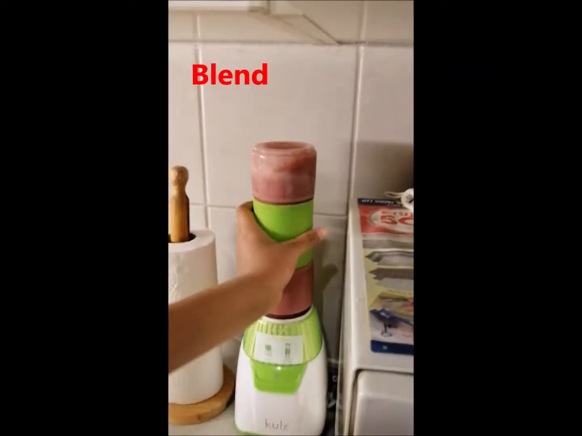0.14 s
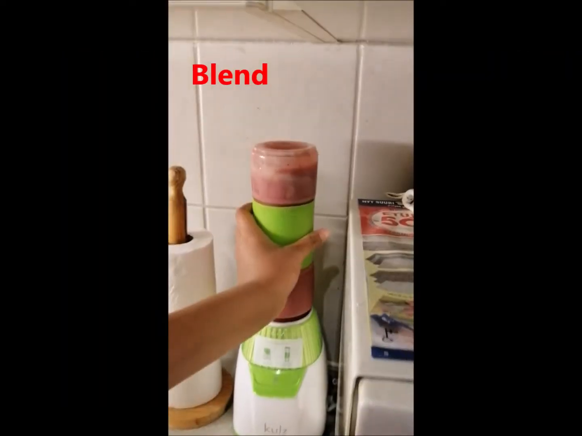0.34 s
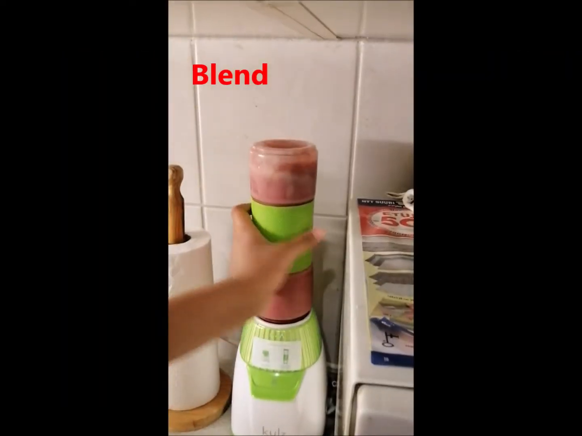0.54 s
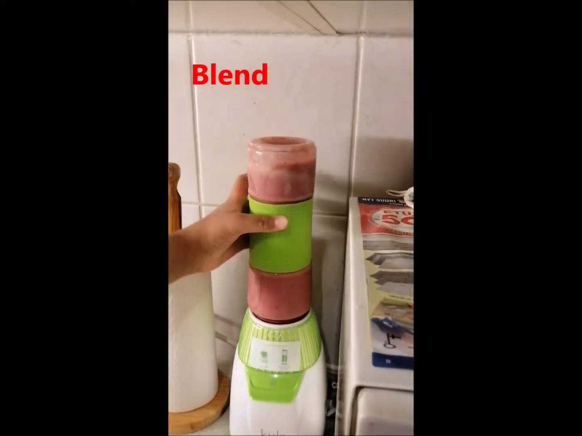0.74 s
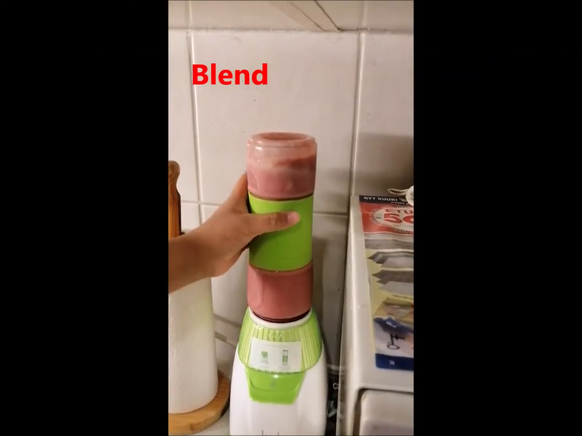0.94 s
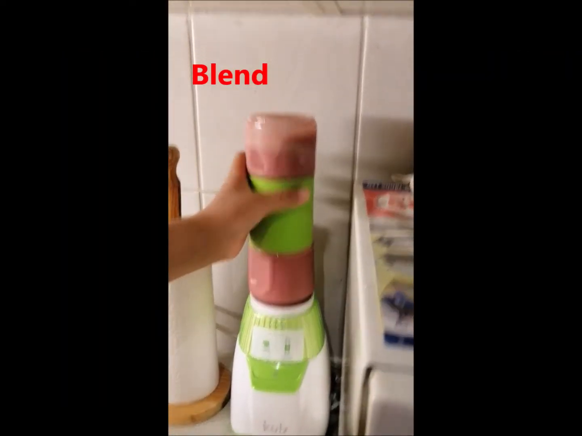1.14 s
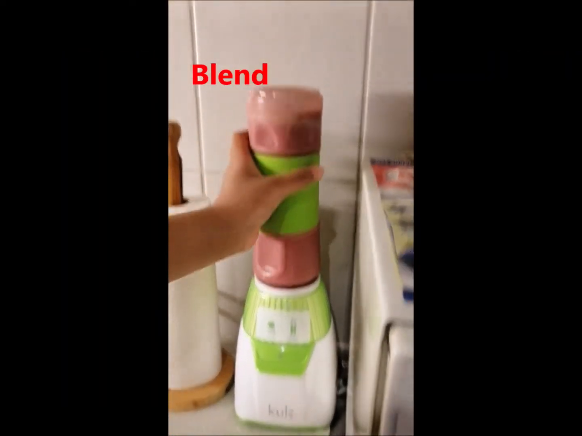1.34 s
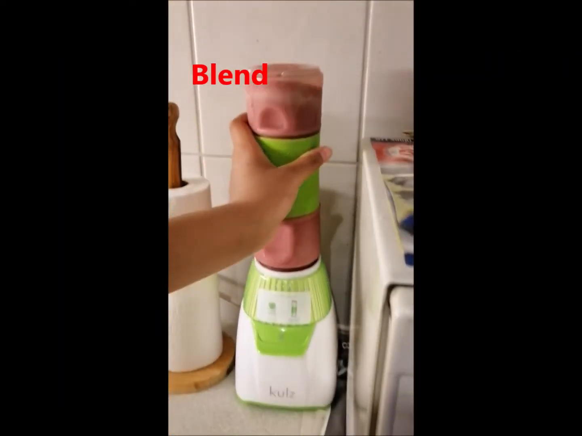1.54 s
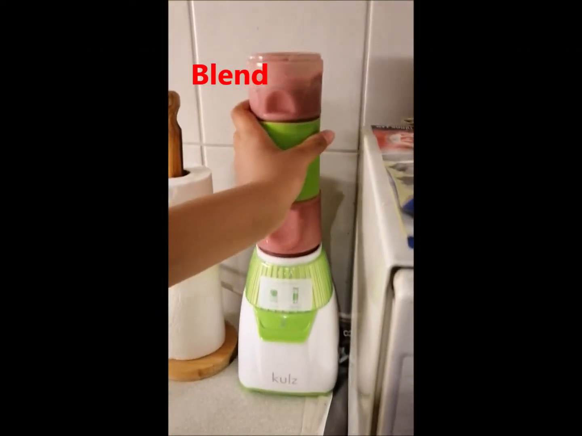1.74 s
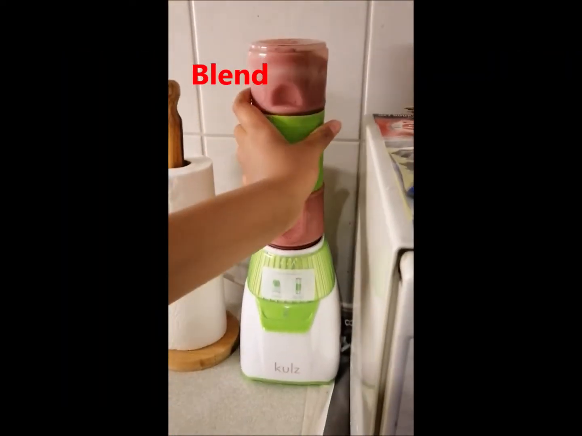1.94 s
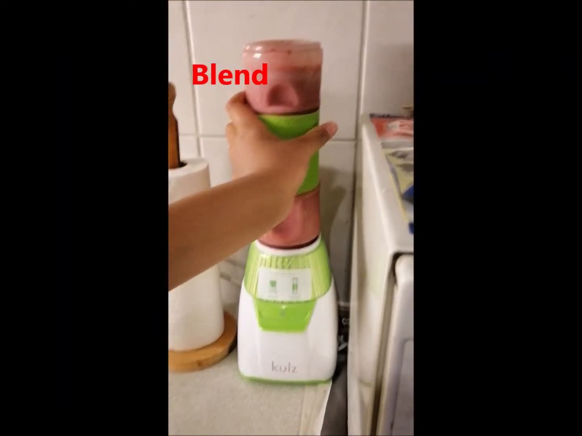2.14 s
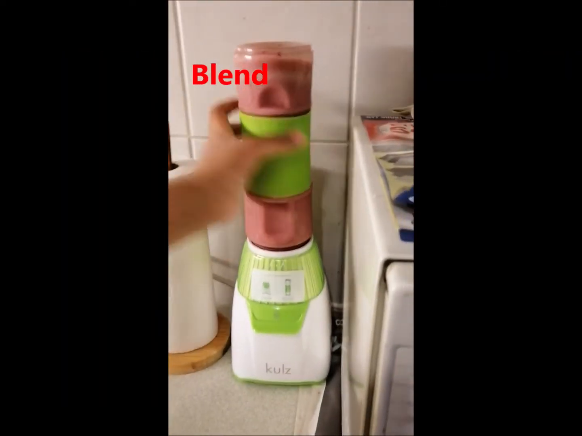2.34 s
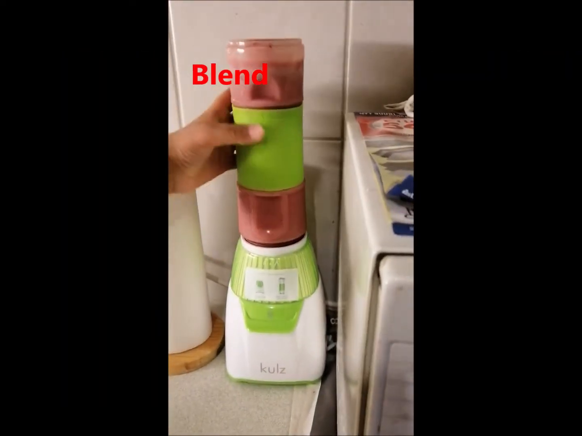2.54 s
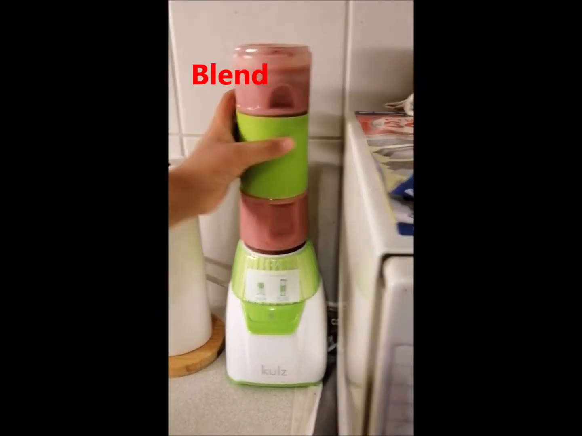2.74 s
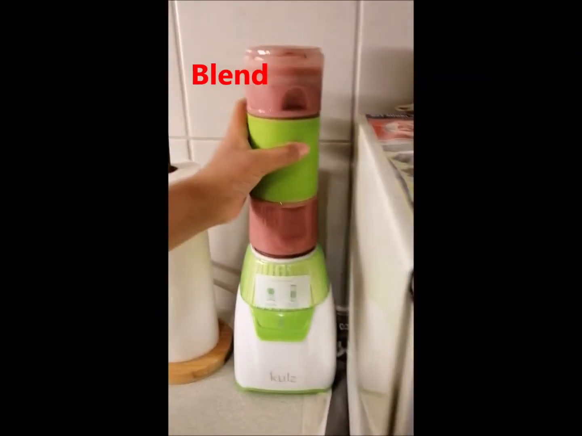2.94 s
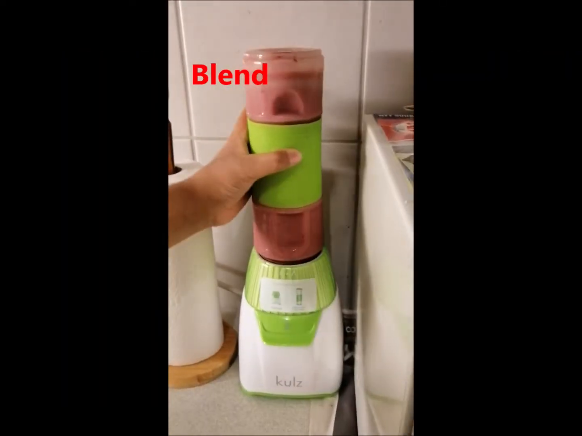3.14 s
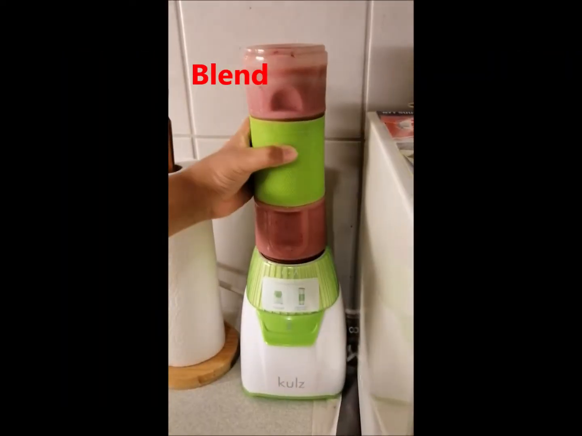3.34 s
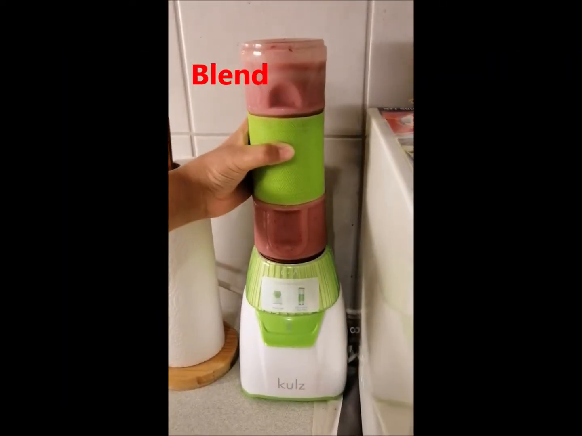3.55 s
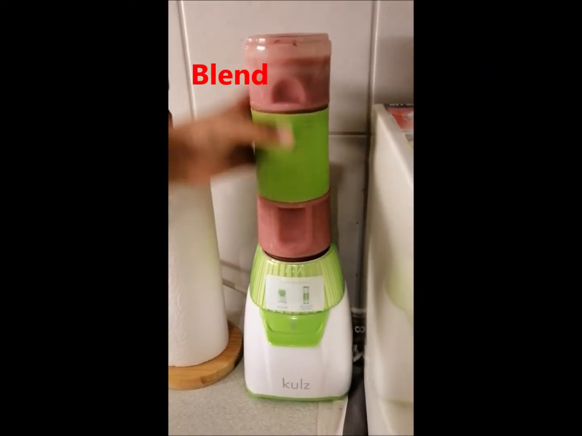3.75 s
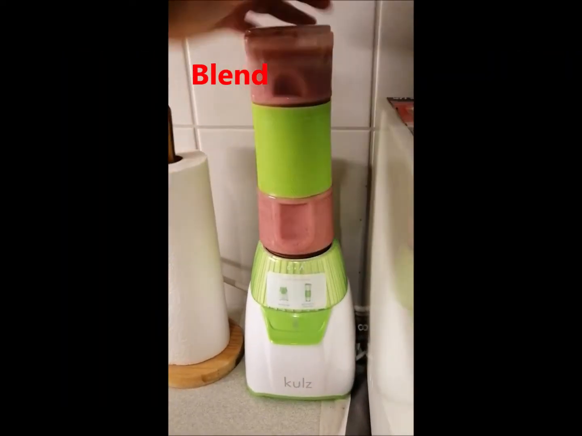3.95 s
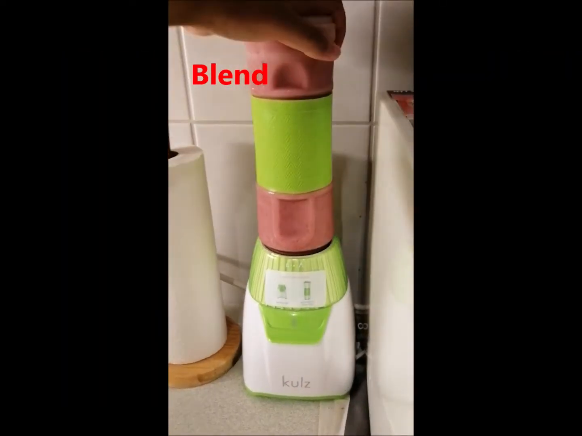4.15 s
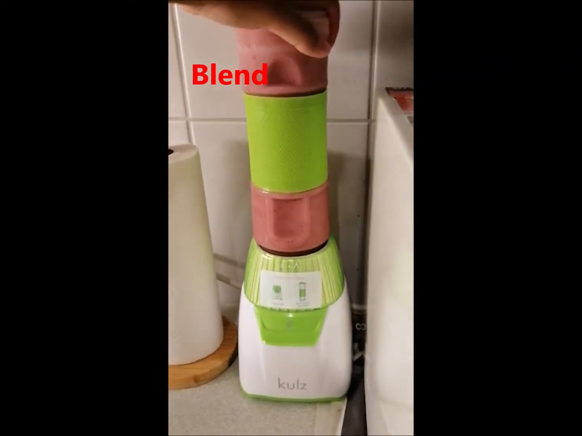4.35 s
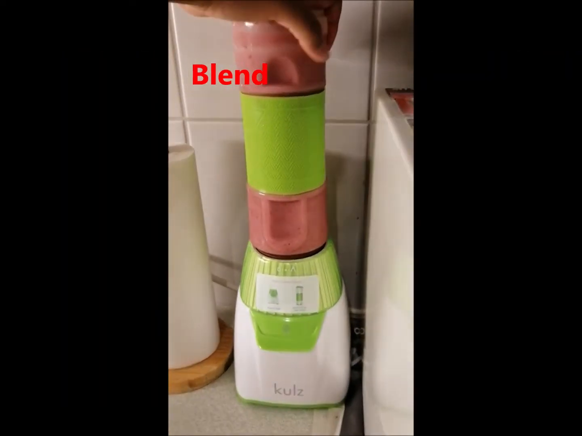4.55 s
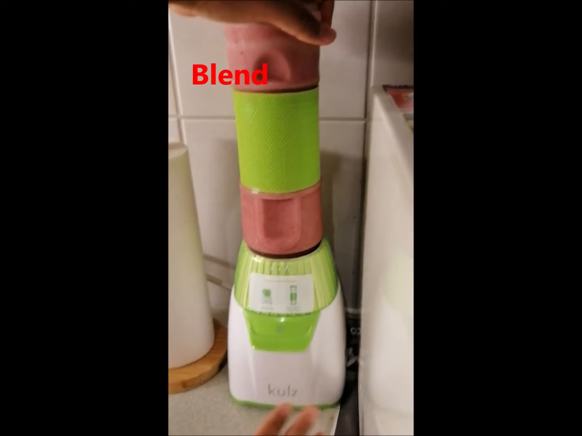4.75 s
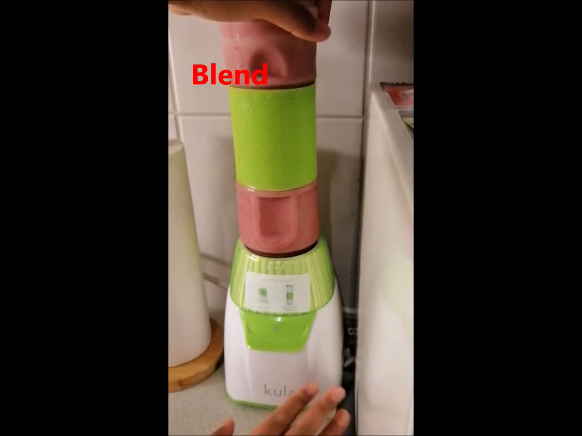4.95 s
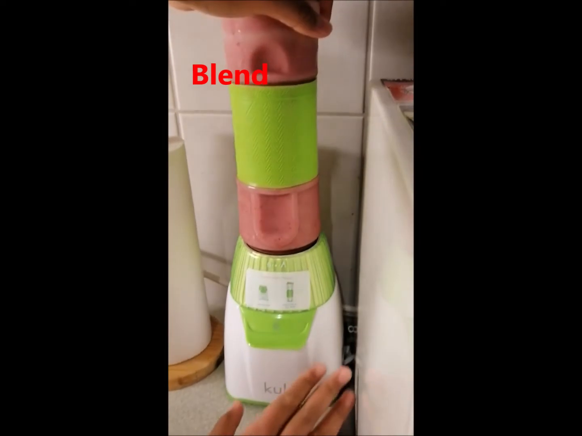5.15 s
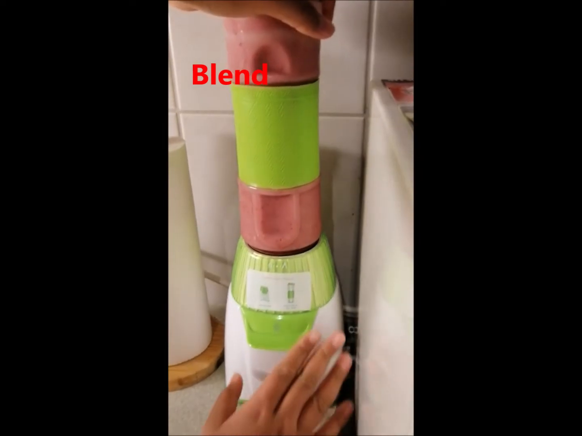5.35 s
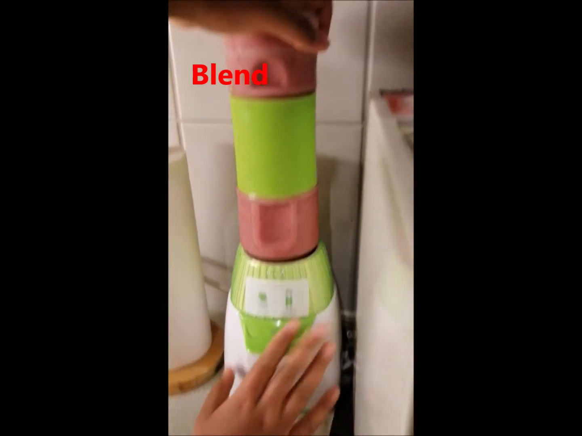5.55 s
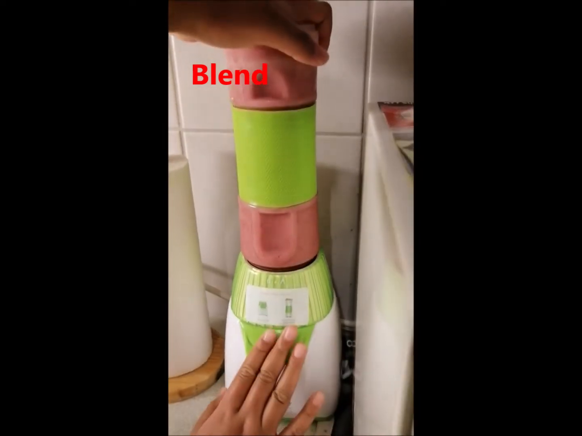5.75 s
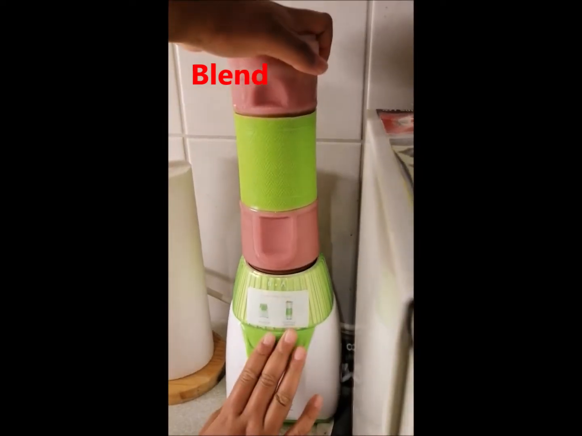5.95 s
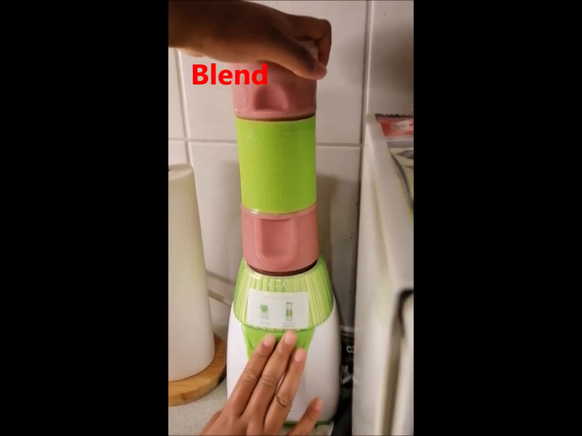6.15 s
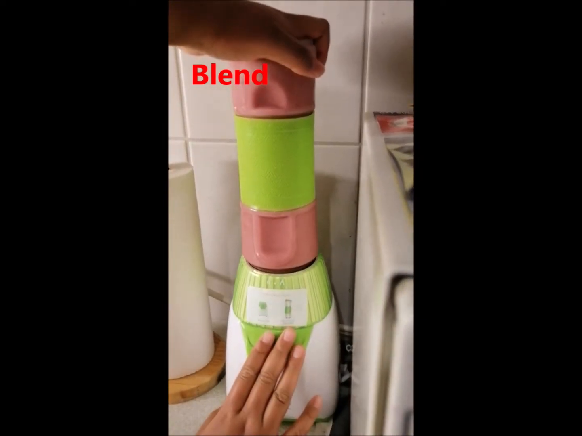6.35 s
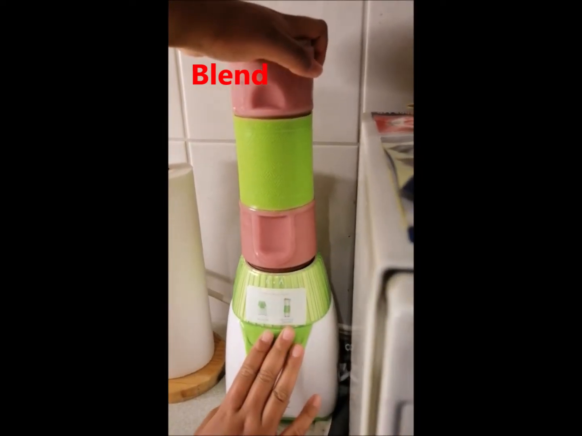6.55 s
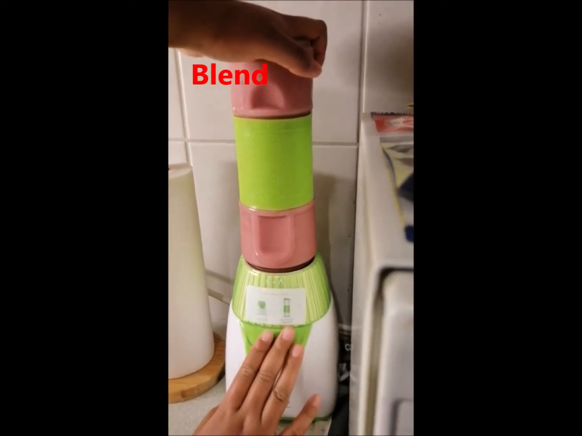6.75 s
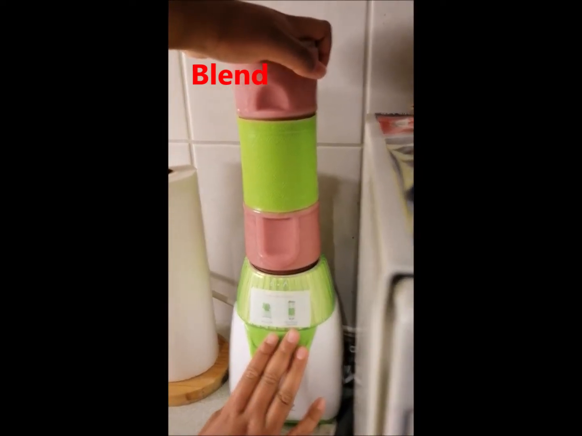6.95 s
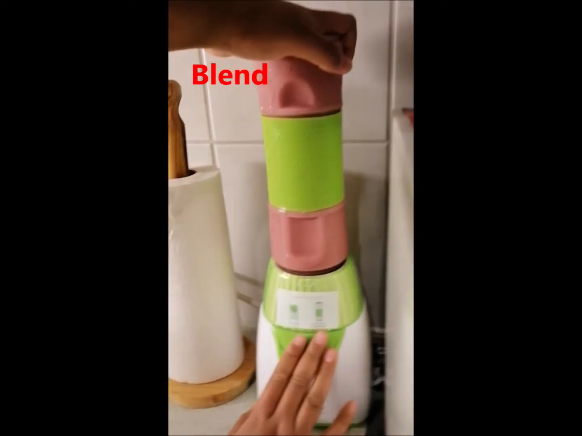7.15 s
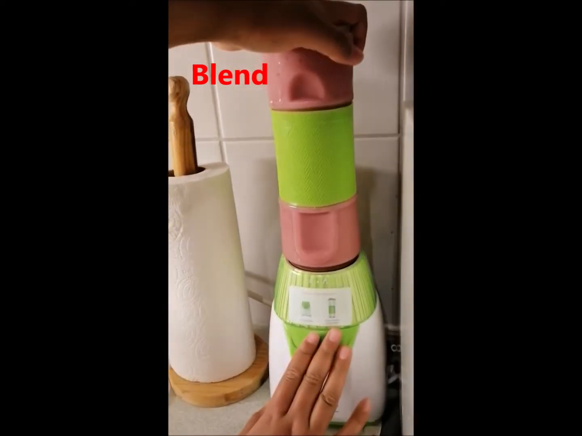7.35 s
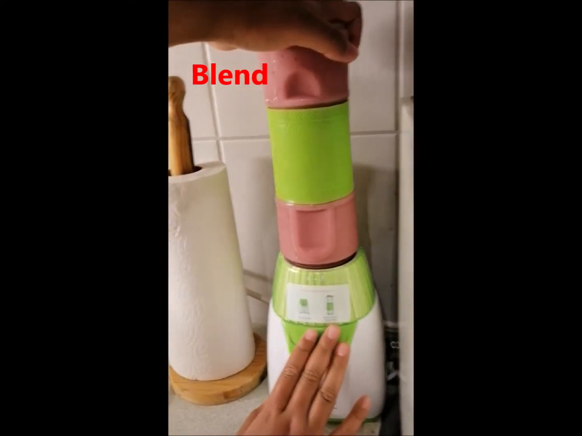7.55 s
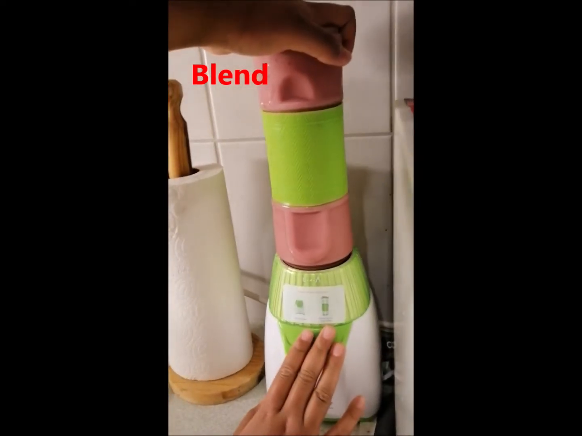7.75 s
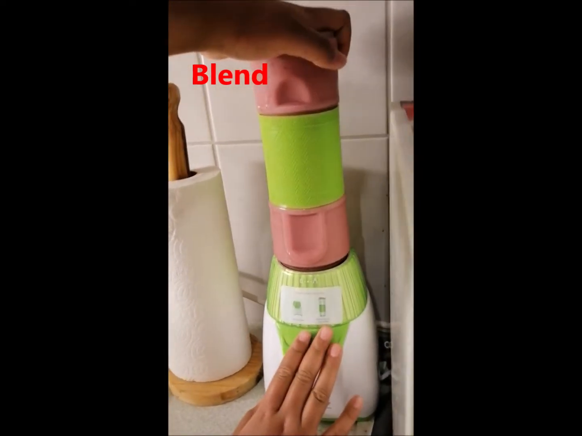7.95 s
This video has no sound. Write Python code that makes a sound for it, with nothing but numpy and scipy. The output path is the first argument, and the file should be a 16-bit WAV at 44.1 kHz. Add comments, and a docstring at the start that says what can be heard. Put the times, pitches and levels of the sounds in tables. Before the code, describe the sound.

A plastic bottle knocks and scrapes into a blender base, then a small motor starts suddenly and loudly churns fruit.

```python
"""A bottle blender runs on a kitchen worktop, close to a phone. Its blade chops fruit and churns the pulp,
runs lighter in an air pocket and bites again; the shaft hums, and dense impacts excite the resonances
of bottle and housing. Before the motor starts, a hand twists the full plastic bottle into the base with
knocks, ticks and scrapes and slides over it. Room noise and faint far whistles lie underneath."""
import sys
import numpy as np
from scipy import signal
from scipy.fft import rfft, irfft
from scipy.io import wavfile
from scipy.ndimage import uniform_filter1d

SR = 44100
rng = np.random.default_rng(int(sys.argv[2]) if len(sys.argv) > 2 else 0)


def int16_out(signal):
    """Quantize to a 16-bit WAV file."""
    q = np.round(np.clip(np.atleast_2d(signal).T, -1, 1) * 32767)
    wavfile.write(sys.argv[1], SR, q.astype(np.int16))


N = 353241
TIME = np.arange(N) / SR
GRID_HZ = np.maximum(np.arange(4097) * SR / 8192, 1)
MOTOR_START_S = 5.93

# Resonances, all with columns: centre_hz, width_hz, level_db, pan_db (left minus right)
HOUSING_MODES = [(275.5, 38, -6.5, -2), (301, 19, -3, -2.5), (336, 43, -1.5, 2), (349, 81, -9, 2.2),
                 (433, 45, -9, -0.5), (509, 158, -6, 0.2)]  # motor housing
RING_MODES = [(585.2, 72, -2.4, -7.5), (1886, 88, 0, 0)]  # one hollow ring, one bright ring
BOTTLE_MODES = [(650, 190, -11, -3.5), (776, 91, -7, 3.5), (853.5, 77, -3, 5.5), (953, 144, -8.5, 7),
                (1066, 49, -3.5, 3.5), (1147, 65, -7, -4.5), (1285, 122, -8.5, 2), (1445, 93, -6.5, -2),
                (1510, 68, -7, -4), (1574, 136, -8, -2.5), (1696, 51, -9.5, -10), (1746, 91, -9.5, -12),
                (1950, 230, -11.5, 2.5), (2086, 126, -12, -12.5), (2310, 53, -11.5, -2),
                (2361, 380, -8, -3), (2627, 52, -11, -8), (2930, 540, -15, 6.5), (3290, 760, -17.5, 7)]  # plastic bottle
BLADE_MODES = [(4680, 1320, -16, -5.5), (5190, 610, -13, -10), (5790, 740, -13.5, 3),
               (6610, 1730, -16.5, -10.5), (7170, 880, -12.5, -10), (8000, 780, -17, 12),
               (8600, 1140, -15.5, 5), (9830, 1060, -25, 10), (12200, 2500, -31, 3.5),
               (14815, 5700, -35.5, 1)]  # blade unit
# direction of the blender as the phone moves: time_s, pan_db
BLENDER_PAN = [(0, 3), (1.1, -5.5), (3.3, -4.5), (4.4, -2), (5.9, 2), (6.1, -1.5), (7.2, -1.5), (7.43, -6),
               (8.01, -8)]


def undb(db):
    """Decibels to amplitude ratio."""
    return 10 ** (np.asarray(db) / 20)


def curves(table):
    """Linear interpolation of each column over time."""
    time_s, *columns = np.transpose(table)
    return [np.interp(TIME, time_s, column) for column in columns]


def swell(middle_s, length_s):
    """A half-cosine pulse of unit height."""
    return np.cos(np.pi * np.clip((TIME - middle_s) / length_s, -.5, .5))


def wander(rate_hz):
    """Smoothed random fluctuation of unit variance."""
    hold = int(SR / rate_hz)
    drift = uniform_filter1d(np.repeat(rng.standard_normal(N // hold + 1), hold)[:N], hold)
    return drift / drift.std()


def sides(pan_db):
    """Left and right gains for an interaural level difference."""
    return undb(np.array([[.5], [-.5]]) * pan_db)


def diffuse_noise(coherent_hz=560, spread=0.3):
    """White noise in a diffuse field: long waves reach both ears alike, short ones uncorrelated."""
    mid, side = rfft(rng.standard_normal((2, N)))
    hz = np.arange(len(mid)) * SR / N
    coherence = (1 - spread ** 2) / (1 + (hz / coherent_hz) ** 8)
    opposed = np.array([[1], [-1]]) * side * np.sqrt((1 - coherence) / 2)
    return irfft(mid * np.sqrt((1 + coherence) / 2) + opposed, N)


def colour(x, gain):
    """Minimum-phase filter shaped by gain on GRID_HZ; white noise keeps its power."""
    cepstrum = irfft(np.log(gain / np.sqrt(np.mean(gain ** 2)) + 1e-5))
    half = len(GRID_HZ) - 1
    cepstrum[:, 1:half] *= 2
    cepstrum[:, half + 1:] = 0
    return signal.fftconvolve(x, irfft(np.exp(rfft(cepstrum))), axes=1)[:, :N]


def resonate(x, modes):
    """Modal filtering: steep resonances add in power at each ear; their levels are relative."""
    power = 0
    for hz, width_hz, db, pan_db in modes:
        detuning = (GRID_HZ / hz - hz / GRID_HZ) * hz / width_hz
        power = power + (undb(db) * sides(pan_db) / (1 + detuning ** 2)) ** 2
    return colour(x, np.sqrt(power))


def decay(power, t60_s):
    """Damping: power falls exponentially, by 60 dB in t60_s."""
    return signal.lfilter([1], [1, -np.exp(-2 * np.log(1000) / (t60_s * SR))], power)


def impulses(start_s, level_db):
    """Impulses of power at the given times."""
    power = np.zeros(N)
    np.add.at(power, (np.asarray(start_s) * SR).astype(int), undb(level_db) ** 2)
    return power


def strike(start_s, level_db, t60_s, modes):
    """Impact excitation: decaying noise bursts drive a set of modes."""
    return resonate(diffuse_noise() * np.sqrt(decay(impulses(start_s, level_db), t60_s)), modes)


def reflect(x):
    """Comb filtering: early reflections interfere with the direct sound."""
    # echoes off the tiled corner and worktop: left_delay_s, right_delay_s, gain_db
    echoes = [(.0021, 0.0045, -14), (.0047, 0.0037, -18), (.0083, 0.013, -14), (0.0144, 0.013, -15)]
    out = x.copy()
    for *delays_s, db in echoes:
        for ear, delay_s in enumerate(delays_s):
            lag = int(delay_s * SR)
            out[ear, lag:] += undb(db) * x[ear, :N - lag]
    return out


def kitchen(level_db=-64.5):
    """Ambient noise: the room's broadband rumble and hiss waver slightly."""
    # noise spectrum: frequency_hz, relative_density_db
    spectrum = [(15, -35), (25, 1), (59, -10.5), (98, 0), (172, -5), (237, -8), (301, -9), (383, -8.5),
                (462, -16), (790, -16), (1240, -22), (2630, -21.5), (3930, -35), (7090, -30), (15000, -48)]
    hz, db = np.transpose(spectrum)
    gain = undb(np.interp(np.log(GRID_HZ), np.log(hz), db)) * sides(-3.5)
    return undb(level_db + .8 * wander(8)) * reflect(colour(diffuse_noise(), gain))


def whistles(overtone_db=-23):
    """Faint far tones, unsteady through random frequency and amplitude modulation."""
    # one contour for each note: time_s, pitch_hz, level_db
    notes = [
        [(.5, 2050, -80), (.64, 2054, -81), (.82, 2054, -82)],
        [(3.88, 1995, -80), (3.9, 2030, -62), (3.94, 2190, -62.5), (3.98, 2180, -74), (4.04, 2136, -69),
         (4.13, 2200, -82)],
        [(5.04, 1950, -81), (5.1, 1900, -73), (5.15, 1904, -71), (5.22, 1770, -89)],
    ]
    out = 0
    for note in notes:
        hz, db = curves(note)
        phase = 2 * np.pi * np.cumsum(hz * (1 + 0.0079 * wander(150))) / SR
        tone = np.sin(phase) + undb(overtone_db) * np.sin(2 * phase)
        sounding = (TIME > note[0][0]) & (TIME < note[-1][0])
        out = out + sounding * undb(db + 2.6 * wander(60)) * tone
    return out * sides(-17.5)


def bumps():
    """Damped low resonances: soft, dull bumps, one of them as the sound cuts back in."""
    # soft bumps: start_s, level_db
    onsets = [(.001, -43), (.5, -51), (4.89, -57), (4.925, -57)]
    return strike(*np.transpose(onsets), t60_s=0.15, modes=[(35, 50, 1, 0), (104, 110, -4.5, 0)])


def rubbing(hiss_hz=7000, holding_db=-81):
    """Sliding friction of skin on plastic: a soft hiss swells with each stroke."""
    # strokes of the hand: middle_s, length_s, level_db
    strokes = [(0.017, .2, -65), (1.32, 0.16, -69.5), (1.633, 0.15, -68), (4.17, .35, -72),
               (4.789, 0.069, -71), (4.849, 0.54, -69.5), (5.17, 0.045, -70), (5.252, 0.63, -74)]
    gain = undb(holding_db) + sum(undb(db) * swell(s, length_s) for s, length_s, db in strokes)
    grip_db = .6 * wander(60)
    return gain * undb(grip_db) * resonate(diffuse_noise(), BLADE_MODES + [(hiss_hz, 16000, -22, 0)])


def scrapes(rasp_hz=3000, grain_db=3, edge_s=0.00046):
    """Friction of plastic on plastic: the bottle's rim slips in short, gritty bursts."""
    # slips of the rim: start_s, length_s, level_db
    slips = [(0.1015, 0.023, -53), (2.021, 0.011, -57), (2.363, 0.049, -63.5), (2.806, 0.039, -64.5),
             (2.833, 0.021, -45.5)]
    gain = sum(undb(db) * np.clip(np.minimum(TIME - s, s + length_s - TIME) / edge_s, 0, 1)
               for s, length_s, db in slips)
    friction = diffuse_noise() * gain * undb(grain_db * wander(600))
    return resonate(friction, BOTTLE_MODES + BLADE_MODES + [(rasp_hz, 3500, -12, 0)])


def contact(start_s, level_db, modes, t60_s, room_t60_s, room_db, contact_s=0.0043):
    """Elastic impact: power builds over the contact time, then decays with a reverberant tail."""
    power = np.maximum(uniform_filter1d(impulses(start_s, level_db), int(contact_s * SR)), 0)
    tail = undb(room_db) ** 2 * decay(power, room_t60_s)
    return resonate(diffuse_noise() * np.sqrt(decay(power, t60_s) + tail), modes)


def knocks(cushion_hz=1200):
    """Impacts excite three groups of modes: the worktop thuds, the bottle rings, the blade unit ticks."""
    # the bottle is seated and pressed down: start_s, knock_db, thud_db, tick_db
    seating = [(0.017, -54.5, -62.5, -39.5), (1.106, -33.5, -41, -40), (1.283, -53, -60, -41.5),
               (1.307, -49.5, -52.5, -57.5), (1.344, -51, -51.5, -61.5), (1.643, -46.5, -54, -54),
               (1.727, -56.5, -71, -55), (2.034, -49.5, -60.5, -44.5), (2.068, -43, -62.5, -57),
               (2.128, -53.5, -59, -61.5), (2.512, -49.5, -57.5, -56.5), (2.843, -31.5, -31.5, -32.5),
               (3.217, -45.5, -51, -60.5), (3.279, -50.5, -46, -59), (3.492, -51, -49.5, -70),
               (4.334, -52, -54, -62), (4.362, -49.5, -61.5, -43.5), (4.522, -57, -75, -62),
               (4.567, -72, -80, -54.5), (5.448, -55.5, -73, -60.5), (5.632, -54, -66, -57.5)]
    # worktop resonances: centre_hz, width_hz, level_db, pan_db
    worktop_modes = [(85, 47, 0, -1), (135, 134, -1.5, 0), (202, 82, 0, -1)]
    start_s, knock_db, thud_db, tick_db = np.transpose(seating)
    pan_db, = curves(BLENDER_PAN)
    thud = contact(start_s, thud_db, worktop_modes + HOUSING_MODES[:4],
                   t60_s=0.17, room_t60_s=0.49, room_db=-15)
    knock = contact(start_s, knock_db, HOUSING_MODES[4:] + RING_MODES[:1] + BOTTLE_MODES,
                    t60_s=0.064, room_t60_s=0.19, room_db=-9.5)
    # the hand cushions the bottle, so its upper modes are struck less
    knock = signal.sosfilt(signal.butter(1, cushion_hz, fs=SR, output="sos"), knock)
    tick = contact(start_s, tick_db, BOTTLE_MODES[-3:-1] + BLADE_MODES,
                   t60_s=0.027, room_t60_s=0.12, room_db=-7.5, contact_s=0.0011)
    return (thud + knock + reflect(tick)) * sides(pan_db)


def coupling():
    """Starting transient: the coupling catches, jolting the housing and the bottle's middle modes."""
    jolt = strike([MOTOR_START_S], level_db=-22, t60_s=0.27, modes=HOUSING_MODES[2:])
    clack = strike([MOTOR_START_S], level_db=-19, t60_s=0.05, modes=BOTTLE_MODES[7:10])
    return (jolt + clack) * sides(-2.2)


def chops():
    """Hard impacts excite high modes: bits of fruit crack against the blade."""
    # the hardest bits: start_s, level_db
    cracks = [(5.9246, -27), (5.937, -19.5), (5.953, -25.5), (5.9693, -20), (5.9953, -21.5),
              (6.0163, -23.5), (6.2502, -29), (6.877, -30), (7.0588, -30), (7.233, -31), (7.275, -28),
              (7.4594, -28), (7.6259, -26), (7.7367, -30), (7.8093, -24.5), (7.868, -29.5), (7.935, -31)]
    return strike(*np.transpose(cracks), t60_s=0.033, modes=BOTTLE_MODES[-2:] + BLADE_MODES)


def shaft_angle(load, free_hz=217.4, sag_hz=23, inertia_s=.12):
    """Drag slows the shaft, and inertia smooths the change of speed."""
    lag = int(inertia_s * SR)
    shaft_hz = free_hz - sag_hz * uniform_filter1d(load, lag, origin=(lag - 1) // 2)
    # lumps brake the shaft unevenly
    return 2 * np.pi * np.cumsum(shaft_hz * (1 + 0.0081 * wander(30))) / SR


def shaft_hum(angle):
    """Periodic rotation radiates harmonics of the shaft rate, each flickering in level."""
    # partials of the hum: harmonic_number, level_db
    partials = [(1, -3), (2, -11.5), (3, -13.5), (4, -24), (5, -11.5)]
    return np.sqrt(2) * sum(undb(db + 3.2 * wander(22)) * np.sin(k * angle) for k, db in partials)


def pelting(angle, modes, rate_hz, scatter_db, t60_s, bunching):
    """Shot noise: random impacts of uneven size, bunched once a turn, drive a set of modes."""
    hits = rng.random(N) < rate_hz / SR * (1 + bunching * np.cos(angle))
    strength = undb(scatter_db * np.clip(rng.standard_normal(N), -2, 2))
    power = decay(hits * strength ** 2, t60_s)
    return resonate(diffuse_noise() * np.sqrt(power / power.mean()), modes)


def blender(pocket_start_s=6.58, pocket_rise_s=.07, swirl_rise_s=.08, onset_s=0.0011):
    """Forced vibration: the blade pelts the bottle with pulp while the shaft shakes the housing."""
    # drag of the pulp on the blade: time_s, load (0 spinning free, 1 buried)
    drag = [(5.93, 1), (6.36, 1.16), (6.57, 1.0), (6.66, .14), (7.12, .03), (7.2, .36), (7.4, .42),
            (7.56, 0.59), (8.01, .61)]
    # lumps falling into the blade: middle_s, length_s, size, bright_ring_boost_db
    lumps = [(5.984, 0.14, 1.65, -1), (6.105, .08, 0.86, -1), (6.21, 0.085, 1.0, -1),
             (6.318, 0.078, 0.73, 0), (6.42, 0.097, 0.89, -1), (6.552, .08, .9, -1), (6.814, 0.052, 1.4, 1),
             (7.065, .045, 1.05, -0.5), (7.232, .06, 1.0, 3), (7.391, 0.074, .35, 7),
             (7.453, 0.091, 1.25, 6.5), (7.558, 0.078, 1.1, 0), (7.736, .07, 1.13, -2),
             (7.81, 0.087, 0.27, 8.5), (7.872, 0.088, 0.93, -2), (7.965, 0.094, 0.63, -0.5)]
    # each part's level and its changes: idle_db, per_load_db, open_pocket_db, per_lump_db
    response = {"hum": (-68, 19, 12.5, 0), "slosh": (-56.5, 10, -4, 4.5), "housing": (-45, 5.5, -2, 2.5),
                "wall": (-39.5, 4, 1.72, 2.5), "spray": (-44.9, 6.2, 3, 1.45), "hollow": (-55.5, 8, 7, 9),
                "bright": (-52.5, 5, 10, 3)}
    # resonances of the pulp: centre_hz, width_hz, level_db, pan_db
    pulp_modes = [(95, 24, 2.5, -0.5), (140, 47, 3, 1.5), (185, 31, -9.5, -17.5)]
    load, = curves(drag)
    pan_db, = curves(BLENDER_PAN)
    pocket = np.clip((TIME - pocket_start_s) / pocket_rise_s, 0, 1)  # air opens around the blade
    swirl = np.clip((TIME - MOTOR_START_S) / swirl_rise_s, 0, 1)
    running = np.clip((TIME - MOTOR_START_S) / onset_s, 0, 1)
    lump_size = sum(size * swell(s, length_s) for s, length_s, size, _ in lumps)
    flare_db = sum(db * swell(s, length_s) for s, length_s, _, db in lumps)
    gain = {part: undb(idle_db + load_db * load + pocket_db * pocket + lump_db * lump_size)
            for part, (idle_db, load_db, pocket_db, lump_db) in response.items()}
    angle = shaft_angle(load)
    body = gain["hum"] * shaft_hum(angle)
    body = body + gain["slosh"] * swirl * resonate(diffuse_noise(), pulp_modes)
    housing = pelting(angle, HOUSING_MODES, rate_hz=550, scatter_db=0.5, t60_s=0.015, bunching=0.65)
    wall = pelting(angle, BOTTLE_MODES, rate_hz=420, scatter_db=0.5, t60_s=0.072, bunching=.6)
    spray = pelting(angle, BLADE_MODES, rate_hz=600, scatter_db=2.0, t60_s=0.039, bunching=0.76)
    body += gain["housing"] * housing + gain["wall"] * wall
    body += gain["hollow"] * resonate(diffuse_noise(), RING_MODES[:1])
    body += gain["bright"] * undb(flare_db) * resonate(diffuse_noise(), RING_MODES[1:])
    return running * (body * sides(pan_db) + reflect(gain["spray"] * spray) * sides(0.41 * pan_db))


def scene():
    """Superposition: handling first, then the motor, over the room."""
    handling = knocks() + reflect(scrapes() + rubbing()) + bumps()
    return handling + coupling() + reflect(chops()) + blender() + whistles() + kitchen()


def record(dry):
    """Gating and band limiting: the sound drops out briefly near the start, and the top treble is cut."""
    mute_start_s, mute_end_s, cutoff_hz = .124, .496, 15400
    gate = uniform_filter1d(1. * ((TIME < mute_start_s) | (TIME > mute_end_s)), size=128)
    return signal.sosfilt(signal.ellip(10, .2, 80, cutoff_hz, fs=SR, output="sos"), dry * gate)


dry = scene()
out = record(dry)
int16_out(out)
```